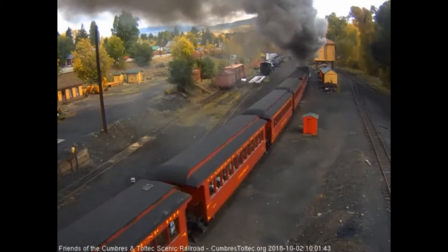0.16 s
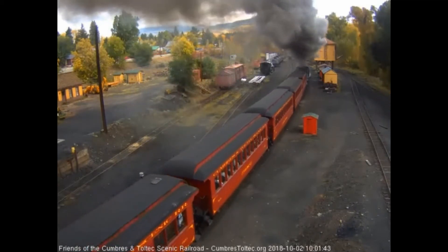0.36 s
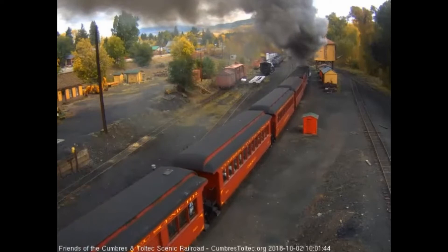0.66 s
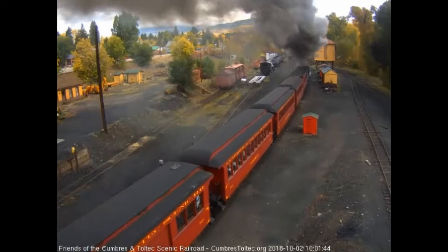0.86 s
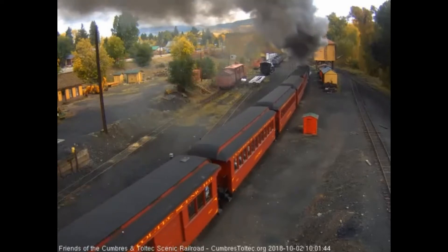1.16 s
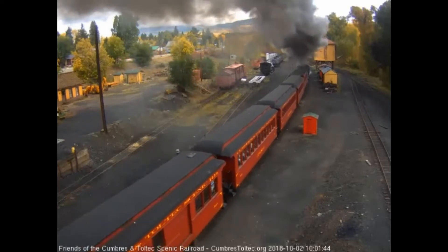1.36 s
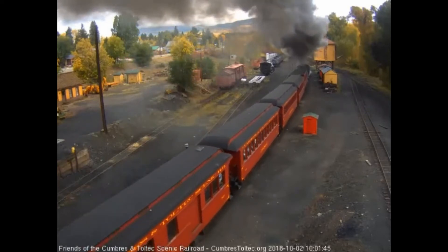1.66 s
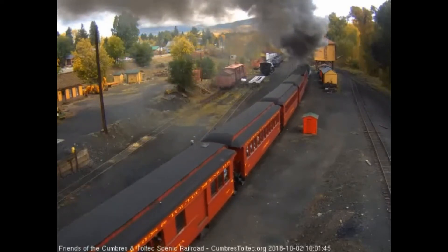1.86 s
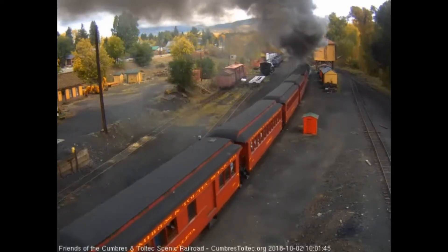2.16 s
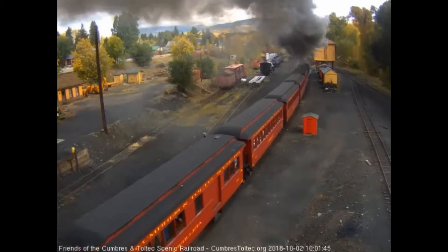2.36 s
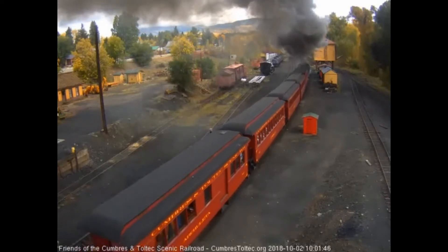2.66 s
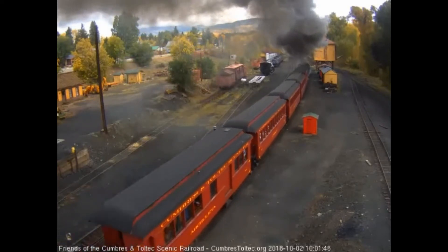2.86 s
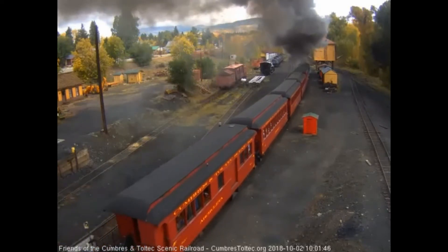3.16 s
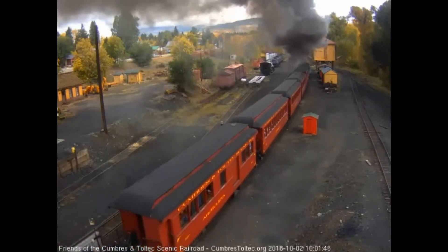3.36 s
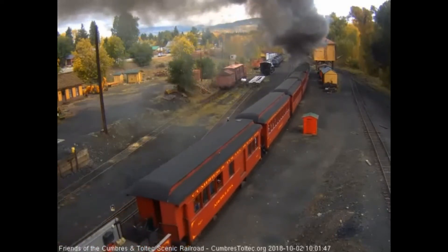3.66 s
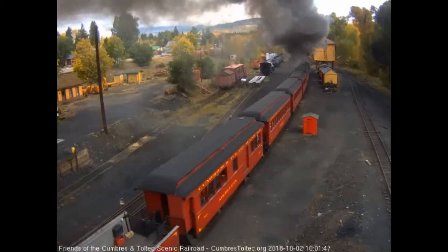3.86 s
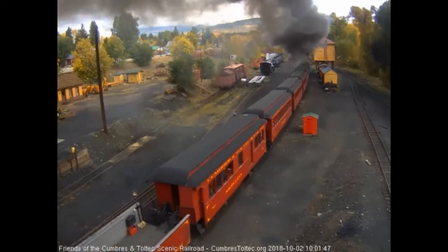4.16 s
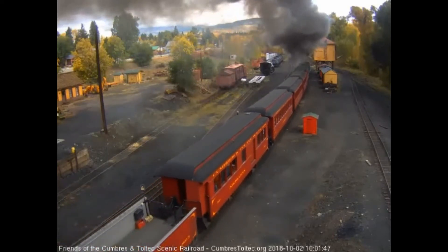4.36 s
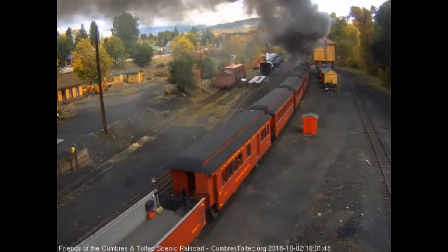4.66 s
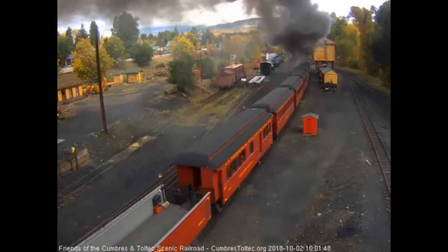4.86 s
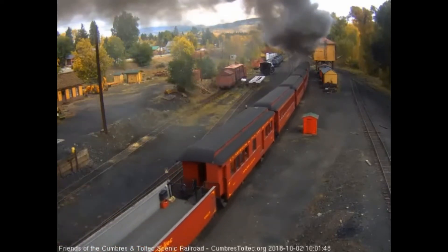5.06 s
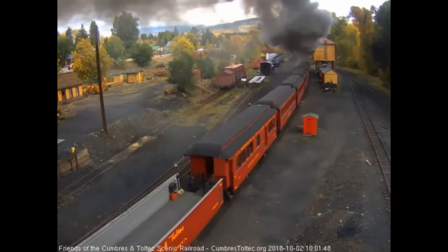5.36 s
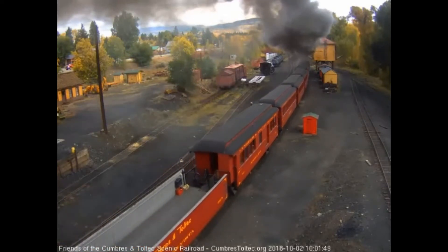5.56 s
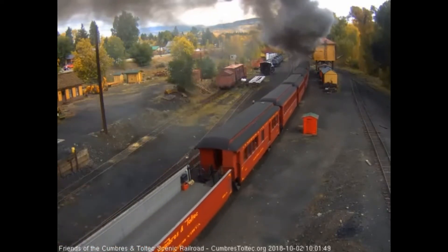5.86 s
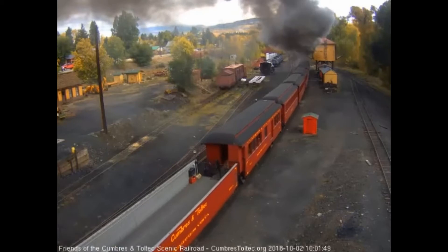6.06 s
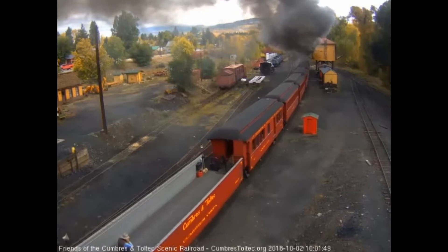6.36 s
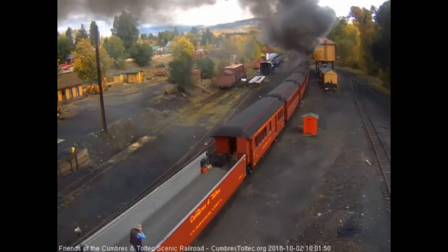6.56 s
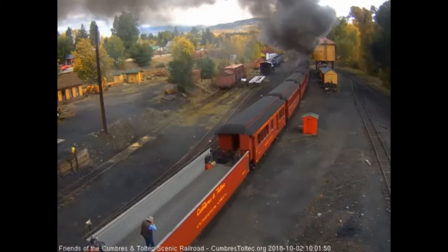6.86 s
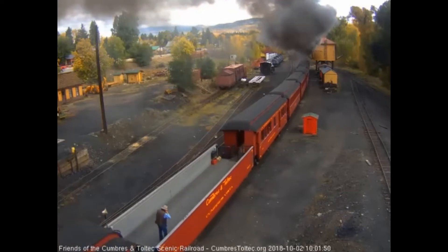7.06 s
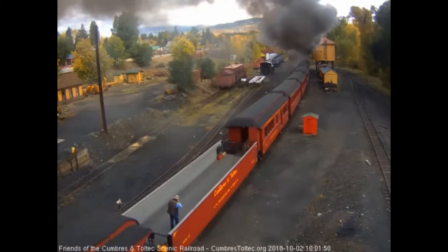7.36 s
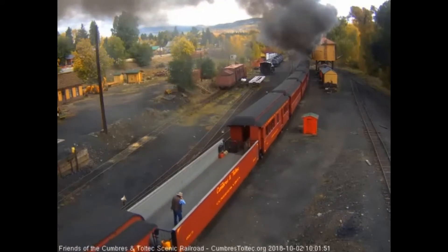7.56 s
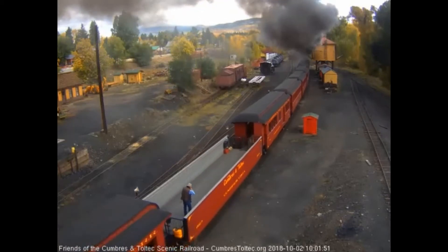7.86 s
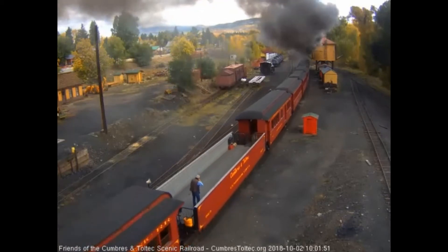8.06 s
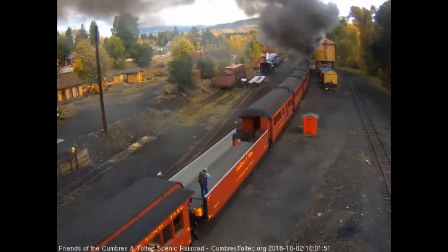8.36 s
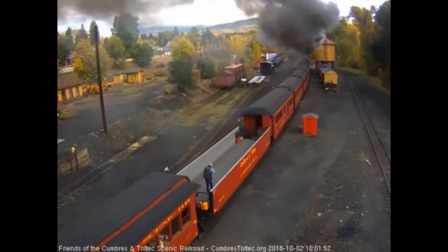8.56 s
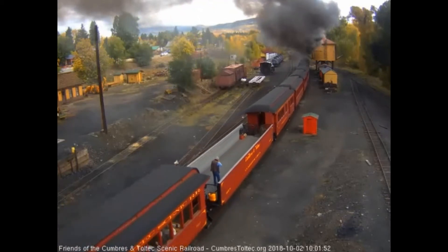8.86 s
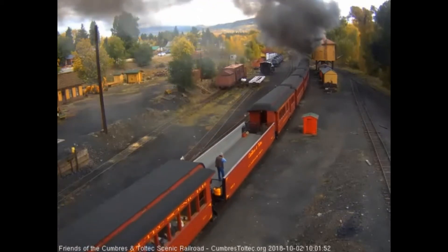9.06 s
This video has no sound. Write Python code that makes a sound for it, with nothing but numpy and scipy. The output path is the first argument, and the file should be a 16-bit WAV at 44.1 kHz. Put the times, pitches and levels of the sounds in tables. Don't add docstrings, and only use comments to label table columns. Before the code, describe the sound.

A distant train whistle calls twice, the second longer and louder, its echo fading into thin hissing steam, rapid clicking and a brief flange squeal.

```python
import sys
import numpy as np
from scipy import signal
from scipy.fft import rfft, irfft
from scipy.io import wavfile
from scipy.ndimage import uniform_filter1d

SR = 44100
rng = np.random.default_rng(int(sys.argv[2]) if len(sys.argv) > 2 else 0)


def output_pcm(signal):
    pcm = np.clip(np.atleast_2d(signal).T, -1, 1) * 32767
    wavfile.write(sys.argv[1], SR, np.round(pcm).astype(np.int16))


def gain_from_db(level_db):
    decades = np.asarray(level_db, float) / 20
    return 10 ** decades


N = 405719
TIME = np.arange(N) / SR
FREQ = np.arange(N // 2 + 1) * SR / N


def level(x, db):
    return x * gain_from_db(db) / np.sqrt(np.mean(x ** 2))


def colour(x, points):
    hz, db = np.transpose(points)
    f = np.maximum(FREQ, 1)
    return irfft(rfft(x) * gain_from_db(np.interp(np.log(f), np.log(hz), db)), N)


def band(x, hz, width):
    return signal.lfilter(*signal.iirpeak(hz, hz / width, fs=SR), x)


def walk(rate):
    k = int(SR / rate)
    held = np.repeat(rng.standard_normal(N // k + 1), k)
    return 1.313 * uniform_filter1d(uniform_filter1d(held, k), k)[:N]


# (frequency [Hz], density [dB per Hz])
YARD_SPECTRUM = [(12, -46), (20, -13), (42, -10.5), (66, -12), (95, -26.5), (125, -15), (250, -11.5),
                 (582, -19), (760, -14.5), (1460, -9), (1900, -9.5), (2530, -2), (3480, -5.5), (4180, -17)]
# (frequency [Hz], level [dB])
TREBLE_FALL = [(4180, -1.5), (4380, -10), (4480, -8), (4900, -13.5), (5500, -19.5), (6300, -22),
               (7000, -25), (7600, -54)]


def yard_noise():
    return colour(colour(rng.standard_normal(N), YARD_SPECTRUM), TREBLE_FALL)


# (time [s], level [dB])
STEAM_FLOW = [(0, -52.5), (1.2, -50.5), (3.3, -53.5), (4.8, -53.5), (5.2, -52), (6.1, -54), (6.6, -51),
              (8.35, -51), (9.2, -53.5)]


def hiss(swell_db=-0.12, flicker_db=1.82):
    spectrum = rfft(yard_noise())
    octave = np.log2(np.maximum(FREQ, 1))
    s, db = np.transpose(STEAM_FLOW)
    flow = np.interp(TIME, s, db - np.mean(db)) + swell_db * walk(18)
    middle = signal.butter(4, (2000, 4000), "band", fs=SR, output="sos")
    scale = 1 / np.std(signal.sosfilt(middle, irfft(spectrum, N)))
    out = 0
    for centre in np.arange(4, 13.5, .5):
        overlap = np.clip(1 - 2 * np.abs(octave - centre), 0, 1)
        follows = np.clip((centre - 8) / 3, 0, 1)
        out = out + irfft(spectrum * overlap, N) * gain_from_db(flicker_db * walk(12) + follows * flow)
    return out * scale * gain_from_db(np.mean(db))


# (frequency [Hz], width [Hz], level [dB])
MACHINE_TONES = [(4290, 15, -75.5), (4180, 32, -77.5), (2454, 30, -62), (42, 22, -80)]


def whine():
    tones = 0
    for hz, width, db in MACHINE_TONES:
        narrow = band(band(rng.standard_normal(N), hz, width), hz, width)
        tones = tones + level(narrow, db)
    return tones


# (time [s], level [dB], length [s])
JOINT_BLOWS = [(2.45, -50.5, .047), (3.003, -50, .044), (3.824, -53.5, .052), (4.034, -51.5, .03),
               (4.254, -50, .023), (5.053, -51, .023), (5.218, -53, .065), (5.478, -52, .022),
               (5.652, -50.5, .034), (6.81, -55.5, .022), (7.107, -54.5, .04), (7.588, -52.5, .042),
               (7.916, -48.5, .019), (7.999, -50, .058), (8.366, -53.5, .05), (9.187, -51, .056)]


def joints():
    rush = colour(rng.standard_normal(N), [(150, -33), (400, -11.5), (800, -3.0), (1500, -3.0),
                                           (2300, 3.5), (3500, 1.5), (5000, -36.5), (7400, -53.5)])
    swell = sum(gain_from_db(db) * np.exp(-((TIME - s) / length) ** 2) for s, db, length in JOINT_BLOWS)
    return swell * level(rush, 0)


# (time [s], speed [turns per s])
ENGINE_SPEED = [(2.4, 8.072), (3.2, 7.315), (3.9, 7.665), (4.4, 7.881), (4.75, 8.956), (5.4, 9.322),
                (6.1, 8.891), (6.6, 7.899), (7.0, 8.301), (7.7, 8.63), (8.7, 8.681), (9.2, 8.307)]
# (time [s], peak at the turn [dB], peak at the half turn [dB])
KNOCK_LEVEL = [(0, -45, -43), (3.9, -46, -42), (4.9, -38.5, -42), (9.2, -39.5, -41.5)]
PART_RINGS = (2456, 2618, 2620, 2450, 2890)
# (time [s], peak [dB], ring [Hz])
HARD_KNOCKS = [(0.2698, -39, 2440), (2.4144, -37, 2440), (2.5147, -39, 2480), (3.7025, -41, 2450),
               (4.0108, -36, 2460), (4.4159, -38, 2630), (4.6563, -33, 2470), (4.8793, -38, 2440),
               (5.0414, -38, 2450), (5.3168, -36, 2620), (5.4246, -37, 2470), (5.8611, -37, 2620),
               (6.0846, -36, 2640), (6.1978, -37, 2450), (6.4333, -36, 3340), (6.5201, -39, 2840),
               (6.9287, -36, 2470), (6.983, -37, 3050), (7.0978, -36, 2470), (7.233, -36, 2640),
               (7.4076, -37, 2610), (7.6425, -35, 2880), (7.7568, -35, 2450), (7.9892, -34, 3350),
               (8.2192, -34, 2600), (8.2776, -37, 3330), (8.4492, -37, 2530), (8.6812, -35, 2900),
               (8.7974, -32, 3330), (8.9136, -36, 3140)]


def strokes(chance, scatter_db=1.2, spread=0.013):
    turns = np.cumsum(np.interp(TIME, *np.transpose(ENGINE_SPEED))) / SR
    turns = turns - np.interp(4.656, TIME, turns)
    half = np.arange(np.ceil(2 * turns[0]), 2 * turns[-1])
    s = np.interp(half / 2, turns, TIME)
    chance = chance[:len(s)]
    at, turn_db, half_db = np.transpose(KNOCK_LEVEL)
    db = np.where(half % 2 == 0, np.interp(s, at, turn_db), np.interp(s, at, half_db))
    db = db + scatter_db * chance[:, 0]
    part = (1000 * chance[:, 1]).astype(int)
    hz = np.take(PART_RINGS, part, mode="wrap") * (1 + spread * chance[:, 2])
    free = np.abs(s[:, None] - np.transpose(HARD_KNOCKS)[0]).min(axis=1) > .016
    return np.concatenate([HARD_KNOCKS, np.transpose([s, db, hz])[free]])


def ticks(upper_hz=(3450, 4100), crack_db=-6, gain_db=-6.5, upper_db=-4, masked_db=-47, scatter=.02):
    t = TIME[:int(.04 * SR)]
    crack = colour(yard_noise(), [(1500, -7.5), (2300, -.5), (4000, -1.5), (6000, -3.0)])
    crack = level(crack, crack_db)
    decay_s = .0016
    shape = (t / decay_s) ** 2 * np.exp(-t / decay_s) * 2
    rows = strokes(rng.standard_normal((200, 3)))
    out = np.zeros(N + len(t))
    for (s, db, hz), chance in zip(rows, rng.standard_normal((200, 5))):
        i = int(s * SR)
        blow = np.sqrt(max(gain_from_db(db) ** 2 - gain_from_db(masked_db) ** 2, 0)) * gain_from_db(gain_db)
        upper = 0
        for k, ring_hz in enumerate(upper_hz):
            ring = np.sin(2 * np.pi * ring_hz * (1 + scatter * chance[k]) * t)
            upper = upper + gain_from_db(2 * chance[k + 2] - 8 * k) * ring
        rings = np.sin(2 * np.pi * hz * t) + gain_from_db(upper_db + 2.5 * chance[4]) * upper
        out[i:i + len(t)] += blow * shape * (rings + np.resize(crack[i:], len(t)))
    return out[:N]


# (time [s], frequency [Hz], level [dB])
FLANGE_SQUEAL = [
    (8.53, 1855, -80),
    (8.58, 1820, -52.5),
    (8.7, 1850, -59),
    (8.76, 1818, -85),
]


def squeal():
    s, hz, db = np.transpose(FLANGE_SQUEAL)
    phase = 2 * np.pi * np.cumsum(np.interp(TIME, s, hz) * (1 + 0.0069 * walk(50))) / SR
    return gain_from_db(np.interp(TIME, s, db, left=-120, right=-120)) * np.sin(phase)


# (frequency [Hz], width [Hz], level [dB])
HOUSING_RINGS = [(2429, 34, -10.5), (2650, 30, -12.5), (2880, 37, -16), (3390, 51, -15)]


def housing(x):
    return sum(band(x, hz, width) * gain_from_db(db + 2) for hz, width, db in HOUSING_RINGS)


def drift(x, spread_s, rate):
    return np.interp(TIME + spread_s * walk(rate), TIME, x)


# (first return [s], level [dB], 60 dB decay [s])
REFLECTORS = [
    (.015, 1, 1.3),
    (.25, -9, 1.5),
    (.6, -17, 1.5),
    (1.11, -25.5, 3.4),
]


def yard_echo(x, patchy_db=2.5, dull_hz=3500, wet_db=-5):
    rise_s, length_s = .07, 2.0
    power = 0
    for s, db, t60 in REFLECTORS:
        rise = np.clip((TIME - s) / rise_s, 0, 1)
        power = power + (gain_from_db(db - 60 * (TIME - s) / t60) * rise) ** 2
    tail = rng.standard_normal(N) * np.sqrt(power) * gain_from_db(patchy_db * walk(30))
    tail = signal.lfilter(*signal.butter(1, dull_hz, fs=SR), tail)
    tail = tail / np.sqrt(np.sum(tail ** 2))
    return gain_from_db(wet_db) * signal.fftconvolve(x, tail[:int(length_s * SR)])[:N]


# (start [s], length [s], tone [dB], opening time [s], pitch drop while held [0-1])
WHISTLE_BLASTS = [
    (.528, .33, -46, .07, 0.01),
    (1.435, .41, -43.5, .105, .001),
]


def valve():
    shut_drop, close_s = .052, .085
    swell_db_per_s, steam_over_db = 6, 9.3
    tone_law, steam_law, pitch_law = 0.69, 1.0, 1.6
    tone = steam = 0
    drop = np.full(N, shut_drop)
    for s, length, tone_db, open_s, held in WHISTLE_BLASTS:
        ramp = np.clip(np.minimum((TIME - s) / open_s, (s + length - TIME) / close_s), 0, 1)
        opening = ramp ** 2 * (3 - 2 * ramp)
        swell_db = swell_db_per_s * (TIME - s - length / 2) * opening
        tone = tone + gain_from_db(tone_db + swell_db) * opening ** tone_law
        steam = steam + gain_from_db(tone_db + steam_over_db + swell_db) * opening ** steam_law
        drop = drop - (shut_drop - held) * opening ** pitch_law
    return tone, steam, drop


# (frequency at full pressure [Hz], share of the pitch drop [ratio])
PIPES = [(365.2, .95), (437, .35), (545, 1.2), (601, 1.3), (703.5, 1.6)]
# (partial 1 [dB], partial 3 [dB], partial 5 [dB], lost at 2% drop [dB], sent to the slopes [dB])
PIPE_VOICING = [(-2.5, -10.5, -17.5, 4, -6), (-6, -5, -10.5, 1, -8.5), (-2.5, -1, -9, 0.5, -8),
                (-3, -1.5, -9.5, 4.5, -5.5), (-.5, -13.5, -13.5, 14, 2)]
# (multiple [ratio], level [dB])
OTHER_PARTIALS = [(2, -30), (4, -15), (6, -8.5), (7, -5.5), (8, -19.5), (9, -17)]
# (frequency [Hz], density [dB per Hz])
STEAM_JET = [(250, -47), (400, -20), (760, -13.5), (850, -25), (1000, -11), (1300, -7), (1800, -6.5),
             (1950, -8.5), (2400, 1), (3000, -1.5), (3650, -6), (4200, -19), (4800, -26), (6240, -37),
             (7400, -49)]
# (frequency [Hz], level [dB])
AIR_LOSS = [(900, -0.5), (3000, -1), (3700, -8.5), (4200, -21.5), (5000, -37.5), (7000, -45.5)]


def whistle(wobble=0.0021, flutter_db=2.5, breathy=.17, scatter_db=3.0, steam_db=-3, overtone_db=-3.5):
    tone_gain, top_gain, drop = valve()
    low = sent = high = 0
    for (hz, share), (first_db, third_db, fifth_db, lost_db, sent_db) in zip(PIPES, PIPE_VOICING):
        phase = 2 * np.pi * np.cumsum(hz * (1 - share * drop + wobble * walk(60))) / SR
        weak_db = -lost_db * np.minimum(drop / .02, 1.5)
        rough = breathy * (1 + 40 * drop)
        gain = gain_from_db(first_db + weak_db + flutter_db * walk(18))
        note = (1 + rough * walk(90)) * np.sin(phase) + rough * walk(90) * np.cos(phase)
        tone = gain * note
        low = low + tone
        sent = sent + gain_from_db(sent_db + scatter_db * walk(22.96)) * tone
        for k, db in [(3, third_db), (5, fifth_db)] + list(OTHER_PARTIALS):
            gain = gain_from_db(db + weak_db / 2 + 1.3 * flutter_db * walk(40))
            high = high + gain * np.sin(k * phase + k)
    jet = colour(rng.standard_normal(N), STEAM_JET) * gain_from_db(1.6 * walk(80))
    jet = top_gain * level(jet, steam_db)
    high = top_gain * level(colour(high, AIR_LOSS), overtone_db)
    straight = tone_gain * low + high + jet
    to_slopes = tone_gain * gain_from_db(-2.2) * sent + gain_from_db(-5.0) * high + gain_from_db(2.0) * jet
    return straight, to_slopes


def scene():
    blown, sent = whistle()
    far = blown + drift(yard_echo(drift(sent, .00012, 22)), .00018, 14)
    near = hiss() + ticks() + joints() + squeal() + whine()
    return (far + near + housing(near))[None]


# (time [s], level [dB])
TREBLE_DIPS = [
    (.39, -9),
    (.6, -7.5),
    (1.07, -11),
    (1.21, -9),
    (1.55, -8),
    (1.655, -8),
    (1.819, -13.5),
    (1.98, -8),
    (2.42, -8),
    (9.1, -14),
]


def thin_treble(x, dip_s=0.015, hole_db=-7, often=1.5, patch_db=2.2, edge_db=-16):
    spectrum, out = rfft(x), x
    dip_db = sum(db * np.exp(-((TIME - s) / dip_s) ** 4) for s, db in TREBLE_DIPS)
    dip_db = dip_db + hole_db * np.clip(2 * (walk(45) - often), 0, 1) * (TIME > 2.8)
    edges_hz = (4400, 4800, 5200, 5900, 6300, 6700, 7000, 7200, 7500)
    for lo, hi in zip(edges_hz[:-1], edges_hz[1:]):
        ragged = np.clip(2 * walk(30) + (lo - 7200) / 300, 0, 1)
        gain = gain_from_db(patch_db * walk(40) + dip_db + edge_db * ragged)
        out = out + (gain - 1) * irfft(spectrum * ((FREQ > lo) & (FREQ <= hi)), N)
    return out


def low_pass(x):
    return signal.sosfilt(signal.butter(12, 7400, fs=SR, output="sos"), x)


# (start [s], end [s])
SKIP = (6.388, 6.393)


def record(dry):
    start, end = SKIP
    gap = np.interp(TIME, [start, start + .00005, end, end + 0.0023], [0.91, .08, 0.24, 0.91])
    return low_pass(thin_treble(dry) * gap)


dry = scene()
out = record(dry)
output_pcm(out)
```